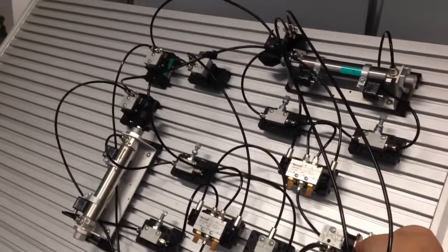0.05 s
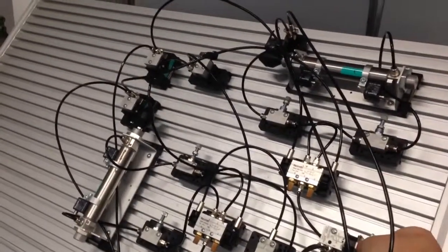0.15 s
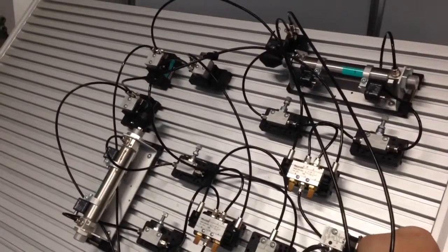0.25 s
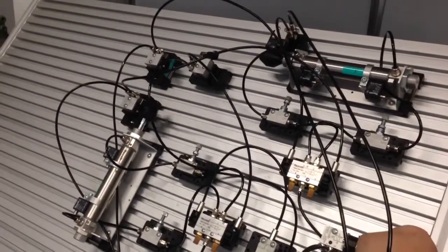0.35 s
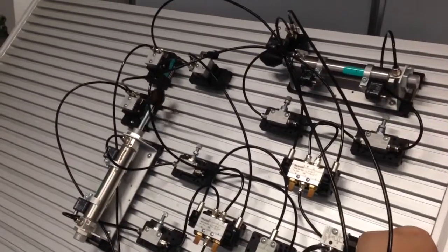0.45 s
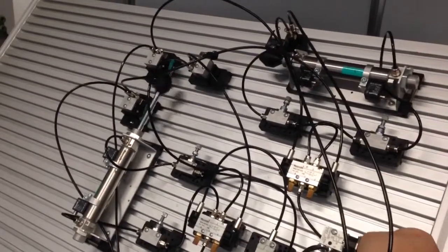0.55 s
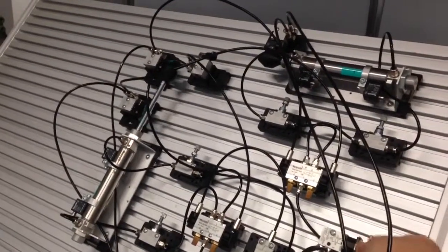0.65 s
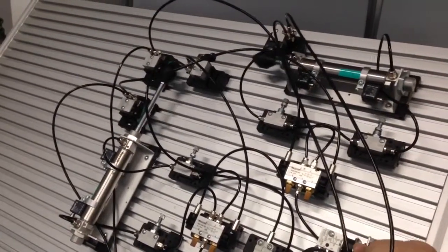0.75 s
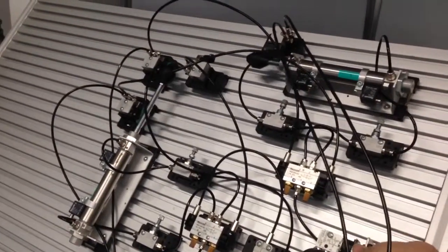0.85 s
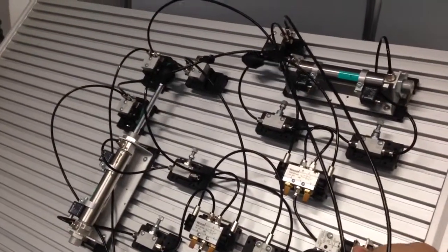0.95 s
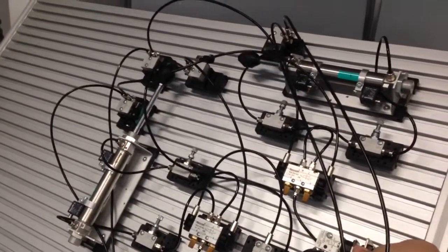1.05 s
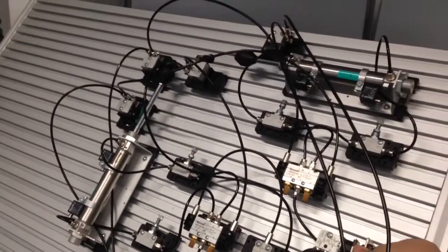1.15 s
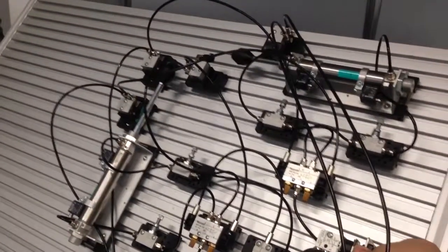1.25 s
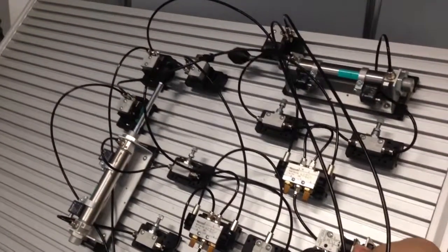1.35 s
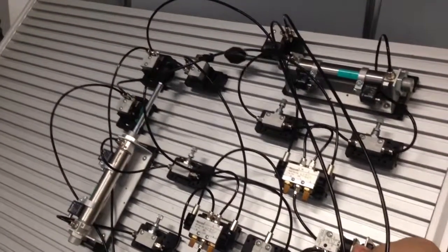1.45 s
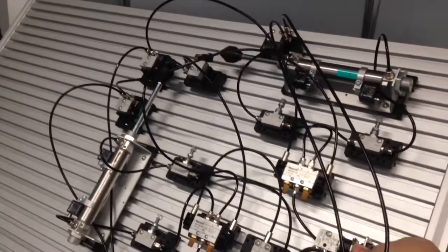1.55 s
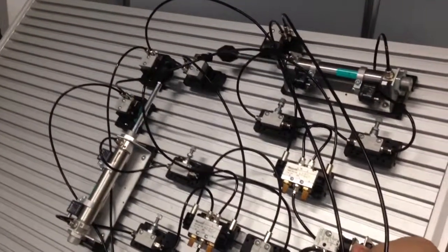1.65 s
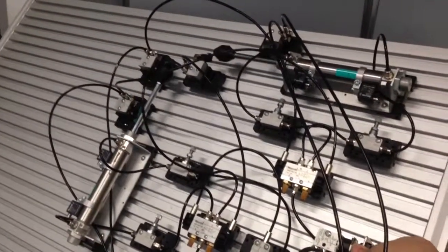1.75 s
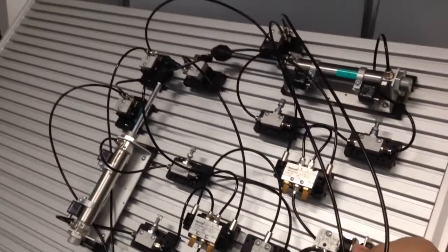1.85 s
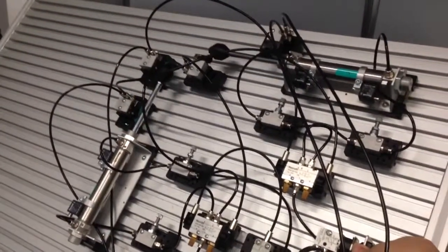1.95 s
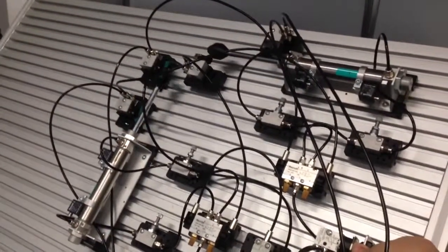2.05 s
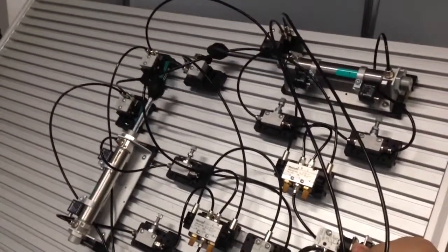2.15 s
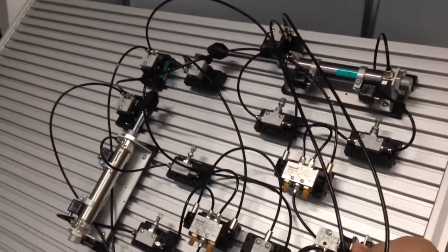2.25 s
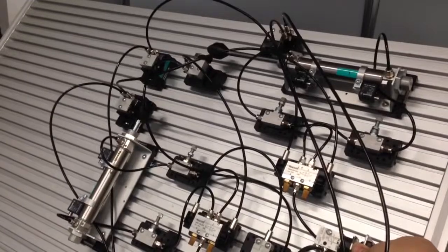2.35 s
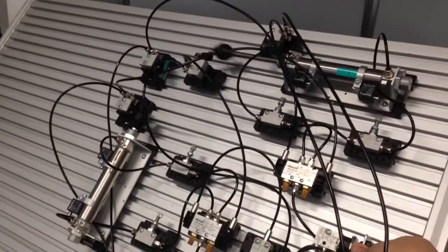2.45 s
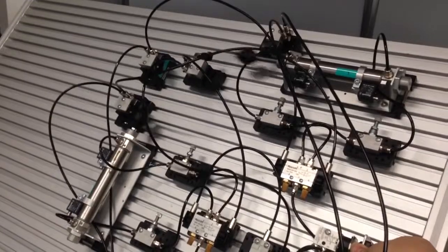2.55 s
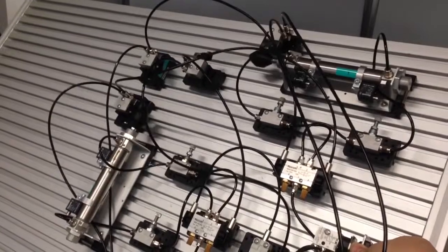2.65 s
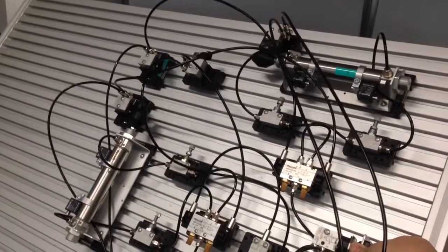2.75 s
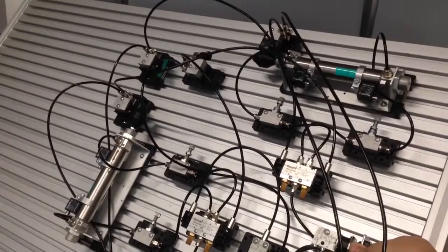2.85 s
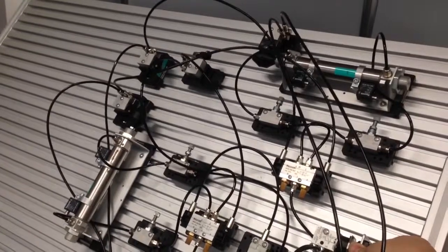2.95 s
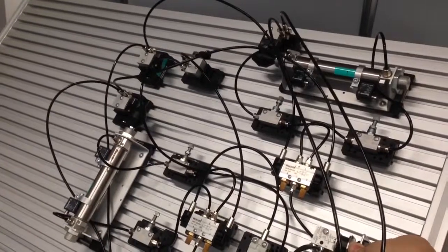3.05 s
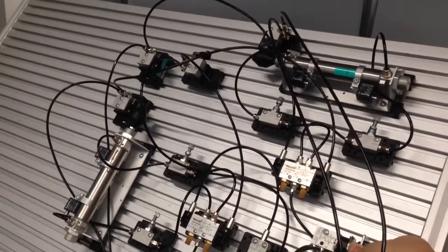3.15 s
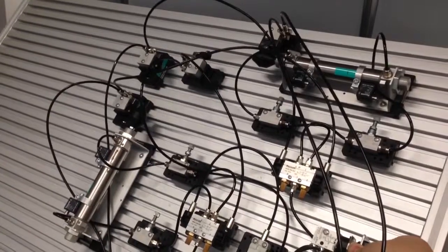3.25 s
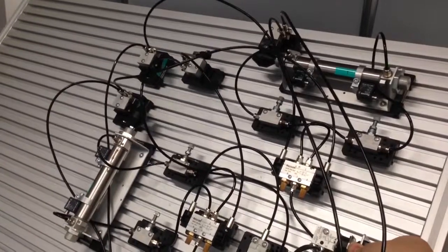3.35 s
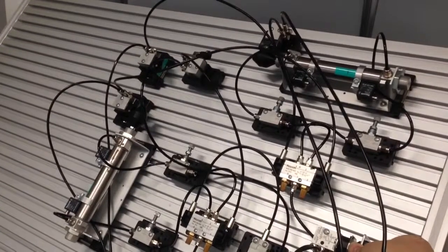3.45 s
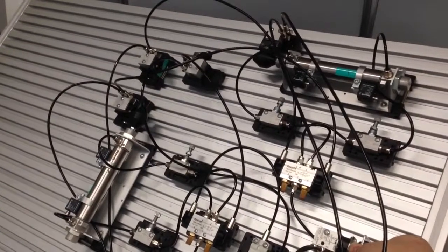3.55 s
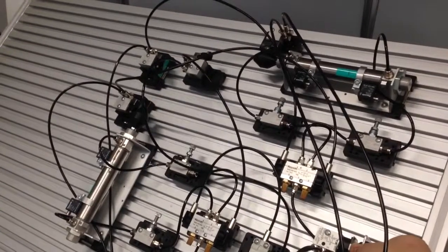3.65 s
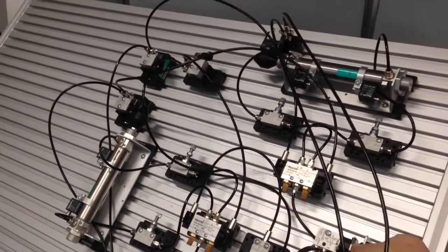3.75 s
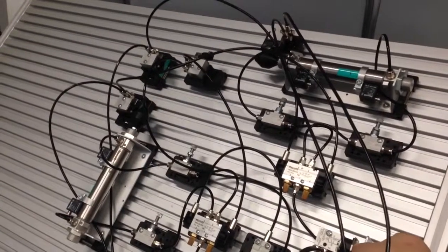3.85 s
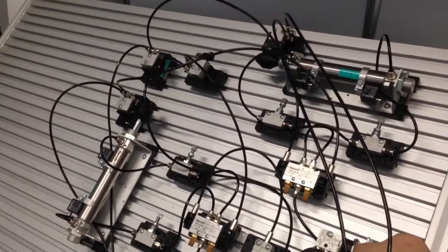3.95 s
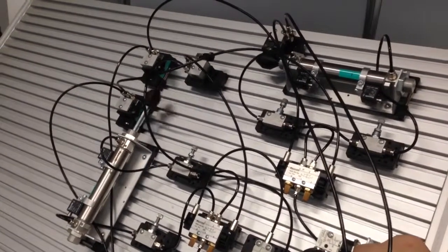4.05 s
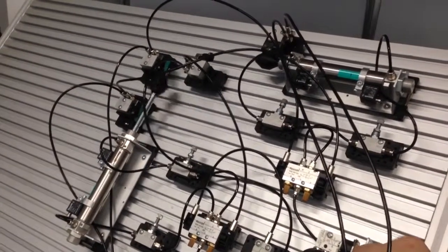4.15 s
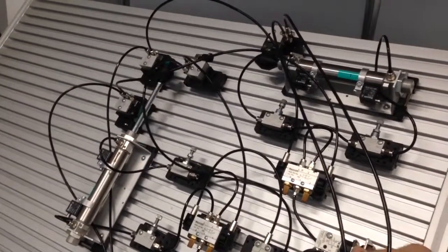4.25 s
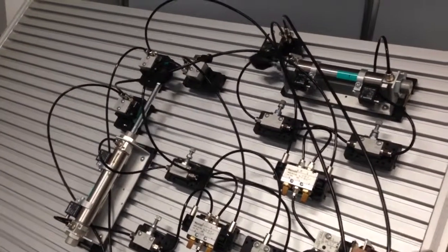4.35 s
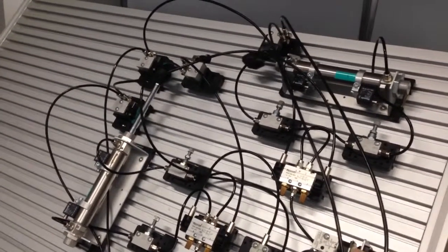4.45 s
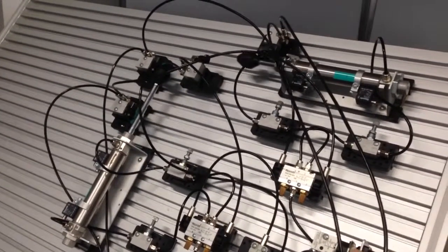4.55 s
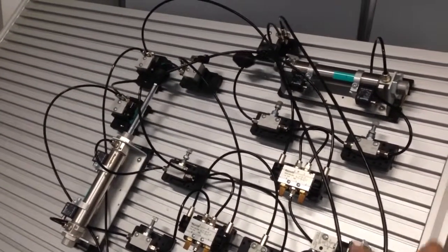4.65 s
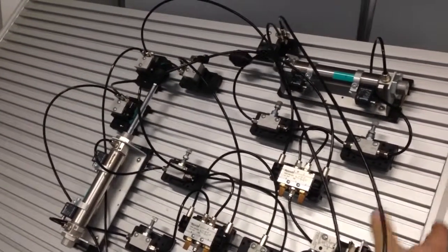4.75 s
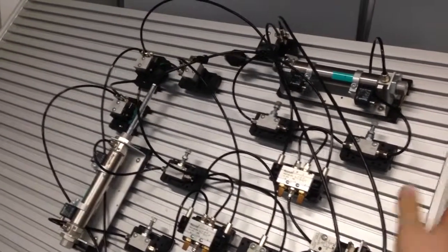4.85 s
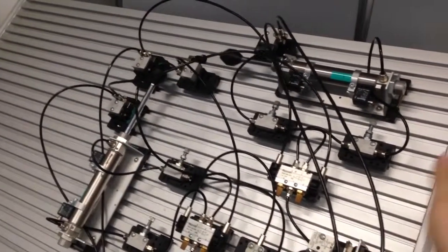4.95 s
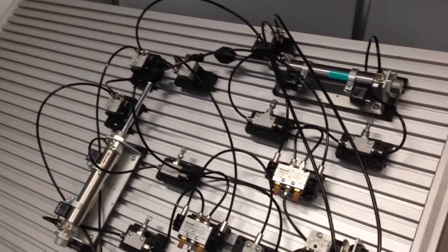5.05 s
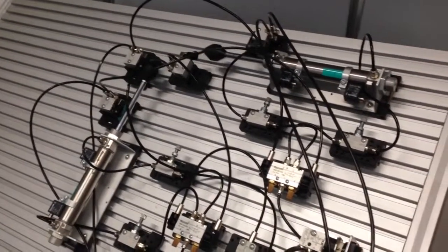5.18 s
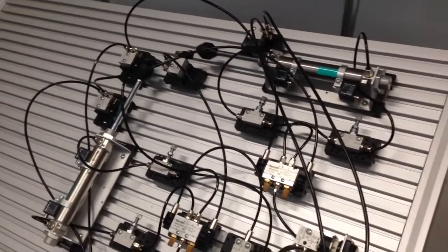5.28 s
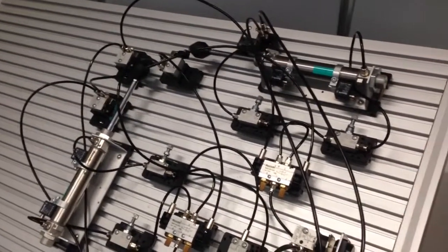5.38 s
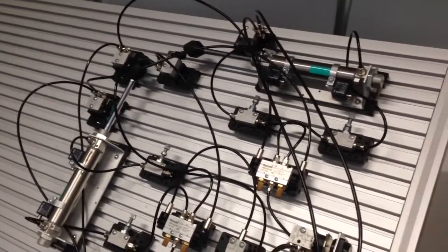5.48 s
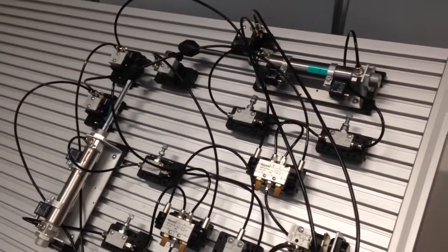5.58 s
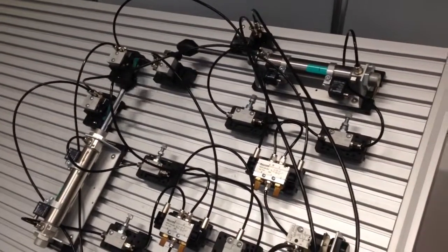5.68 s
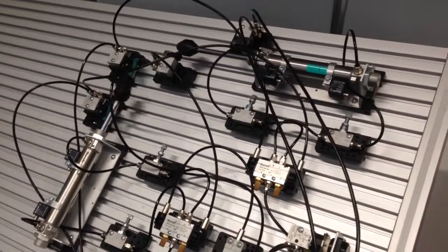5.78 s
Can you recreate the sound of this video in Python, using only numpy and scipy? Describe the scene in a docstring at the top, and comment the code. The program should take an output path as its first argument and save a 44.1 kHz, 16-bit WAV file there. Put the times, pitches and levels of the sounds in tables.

```python
"""In a small classroom, two pneumatic cylinders run through their sequence on a slotted aluminium training board.
A valve slams over with a clack: a jolt of the board, ringing steel and a crack of noise. Air hisses out of a silencer,
as noise coloured by its port, while a piston travels, and the roller switch that the rod leaves vents its pilot line in
a sharp puff. Rods knock, rollers rub, a seal squeaks and a start button clicks, over faint hums and a low background.
The first cylinder is quick; the second creeps out and darts back."""
import sys
import numpy as np
from scipy import signal
from scipy.fft import rfft, irfft, next_fast_len
from scipy.io import wavfile
from scipy.ndimage import uniform_filter1d, minimum_filter1d, map_coordinates

SR = 44100
rng = np.random.default_rng(int(sys.argv[2]) if len(sys.argv) > 2 else 0)


def dump_mix(stems):
    """Bounce the given channels to the path in sys.argv[1] as a 16-bit WAV at rate SR."""
    frames = np.atleast_2d(stems).T  # one column per channel
    limited = np.clip(frames, -1, 1)  # hard clip at full scale
    pcm = np.round(limited * 32767).astype(np.int16)
    wavfile.write(sys.argv[1], SR, pcm)


N = 256662
TIME = np.arange(N) / SR

# the sequence; each stroke starts as its valve shifts, and its other sounds follow at fixed delays:
# stroke, start_s, air_db
STROKE_SEQUENCE = [("first out", .3214, -31.5), ("second out", .6817, -45), ("first back", 1.9538, -33.5),
                   ("second back", 2.4146, -24.5), ("first out", 3.9218, -29),
                   ("second out", 4.2795, -43.5), ("first back", 5.5435, -34)]
# bright noise of a landing spool or a snapping button: freq_hz, relative level_db per Hz
CRACK_SPECTRUM = [(60, -44.5), (300, -14), (1000, 2.5), (3200, 0.5), (4600, 0.5), (6000, -8), (10000, -9),
                  (15000, -16)]
# low rumble of the aluminium board: freq_hz, relative level_db per Hz
BOARD_SPECTRUM = [(25, -39), (70, -8.5), (110, -6.5), (140, 2), (200, 0.5), (260, -5.5), (350, 1),
                  (480, -20.5), (600, -15), (1500, -35), (5000, -66.5)]

# a wide-open blast starts and stops quickly
BLAST_RISE_S, BLAST_T60_S = 0.0007, 0.055
# the second cylinder darts back for this long before it sinks into its end cushion
DART_S = 0.21


def amp(db):
    """Decibels to gain."""
    return 10 ** (np.asarray(db) / 20)


def unit(x):
    """Scaled to rms 1."""
    return x / np.sqrt(np.mean(x ** 2) + 1e-20)


def along(points, hz):
    """Interpolates (freq_hz, value) points on a log frequency axis."""
    point_hz, values = np.transpose(points)
    return np.interp(np.log(hz + 1), np.log(point_hz + 1), values)


def filtered(x, response):
    """Multiplies the spectrum of x by a complex response of frequency."""
    size = next_fast_len(N + SR // 2)
    spectrum = rfft(x, size)
    return irfft(spectrum * response(np.fft.rfftfreq(size, 1 / SR)), size)[:N]


def resonate(x, modes):
    """Lets x ring parallel resonances (freq_hz, width_hz, level_db) of alternating sign."""
    def response(hz):
        total = 0
        for k, (centre_hz, width_hz, db) in enumerate(modes):
            damping = 1j * hz * width_hz
            total = total + (-1) ** k * amp(db) * damping / (centre_hz ** 2 - hz ** 2 + damping)
        return total
    return filtered(x, response)


def white():
    """Fresh white noise."""
    return rng.standard_normal(N)


def noise(spectrum, peaks=()):
    """Coloured noise of rms 1, lifted or dipped around each (freq_hz, width_hz, lift_db)."""
    def response(hz):
        lift = sum(db * np.exp(-((hz - peak_hz) / width_hz) ** 2) for peak_hz, width_hz, db in peaks)
        return amp(along(spectrum, hz) + lift)
    return unit(filtered(white(), response))


def wobble(rate):
    """A smooth random curve through rate random knots a second."""
    knots = rng.standard_normal(int(N * rate / SR) + 4)
    return map_coordinates(knots, [TIME * rate])


def burst(start, rise, hold, t60):
    """Envelope that rises, holds until hold seconds after its start and then falls 60 dB in t60 seconds."""
    t = TIME - start
    return np.clip(t / rise, 0, 1) * amp(-60 * np.clip((t - hold) / t60, 0, 2))


def impulses(rows):
    """One sharp contact for each (start_s, level_db)."""
    times, levels = np.transpose(rows)
    return np.bincount(np.round(times * SR).astype(int), amp(levels), N)[:N]


def each(rows):
    """Plays the rows of a stroke every time that stroke comes round: (start_s, the other columns)."""
    return [(start + delay, *rest)
            for stroke, start, _ in STROKE_SEQUENCE
            for name, delay, *rest in rows if name == stroke]


def staggering_tones(rows, t60):
    """Tones that stagger in pitch and strength; the wider their pitch strays, the faster and rougher."""
    out = np.zeros(N)
    for start, length, hz, width_hz, db in rows:
        pitch = hz + 0.5 * width_hz * wobble(2 * width_hz)
        strength = amp(3.9 * wobble(2 * width_hz))
        tone = unit(strength * np.sin(2 * np.pi * np.cumsum(pitch) / SR))
        out += amp(db) * burst(start, 0.008, length, t60) * tone
    return out


def background():
    """Low noise, a little louder at first before it settles, with faint low hums that come and go."""
    # freq_hz, relative level_db per Hz
    floor_spectrum = [(15, -47), (25, -20.5), (160, -3), (221, -11), (253, -3.5), (399, -15), (631, -10),
                      (703, -16), (895, -15), (1050, -17), (1200, -17.5), (1660, -14), (1950, -12.5),
                      (2630, -25), (15500, -32.5)]
    # start_s, length_s, pitch_hz, width_hz, level_db
    hum_rows = [(0, 0.48, 159.6, 9.37, -58.5), (5.55, .3, 133.6, 9, -50.5)]
    settled_db, early_lift_db, settled_s = -60, 4, 0.83
    level = amp(settled_db + early_lift_db * np.clip(1 - TIME / settled_s, 0, 1))
    return level * noise(floor_spectrum) + staggering_tones(hum_rows, t60=0.329)


def thump(start, hz):
    """The board jumps and settles back; the air follows its acceleration."""
    u = (np.pi * hz * (TIME - start)) ** 2
    return (2 * u - 1) * np.exp(-u)


def valves():
    """Each spool jolts the board, rings the steel fittings and cracks as it lands."""
    # how the spool of each stroke lands, stroke: (steel ring_db, crack_db)
    landings = {"first out": (-21, -19.5), "second out": (-19.5, -21), "first back": (-20, -19),
                "second back": (-18.5, -24.5)}
    # resonances of the steel fittings: freq_hz, width_hz, relative level_db
    steel_modes = [(750, 100, -7), (1124, 160, -5), (1380, 220, -2), (1560, 100, 2), (1738, 63, 1.5),
                   (2065, 69, -4), (2202, 42, 4.5), (2469, 137, 8), (3380, 100, -6), (4020, 59, -10)]
    # every spool jolts the board alike, just after it starts to move
    thump_db, thump_hz, thump_delay_s, shudder_db = -8.5, 344, 0.00259, -35
    jolt, strike, landing, crack, shudder = np.zeros((5, N))
    for stroke, start, _ in STROKE_SEQUENCE:
        ring_db, crack_db = landings[stroke]
        jolt += amp(thump_db) * thump(start + thump_delay_s, thump_hz)
        shudder += amp(shudder_db) * burst(start + 0.001, 0.0022, 0.0049, 0.086)
        landing[round((start + 0.0012) * SR)] = amp(ring_db + 24.0)
        # a short scrape with a quieter, longer one behind it
        scrape = burst(start, 0.0002, 0.00069, 0.021) + amp(-9.5) * burst(start, 0.002, 0.004, 0.15)
        strike += amp(ring_db) * scrape
        crack += amp(crack_db) * burst(start + 0.0015, 0.00018, 0.00129, 0.079)
    ring = resonate(landing + strike * white(), steel_modes) / np.std(resonate(white(), steel_modes))
    return jolt + shudder * noise(BOARD_SPECTRUM) + ring + crack * noise(CRACK_SPECTRUM)


def flow(stroke, rise, t60, sag_db_per_s, longest=np.inf):
    """Air flow of a stroke: on with its valve, sagging with the pressure, out by the next valve shift."""
    ends = [start for _, start, _ in STROKE_SEQUENCE[1:]] + [N / SR]
    out = np.zeros(N)
    for (name, start, db), end in zip(STROKE_SEQUENCE, ends):
        if name == stroke:
            length = min(end - start, longest)
            sag_db = sag_db_per_s * np.clip(TIME - start, 0, length)
            out += burst(start, rise, length, t60) * amp(db - sag_db)
    return out


def cushion():
    """The end cushion lets a thin, dwindling stream of trapped air leak away until the piston seats."""
    cushion_s, below_stroke_db, fade_db_per_s = 0.24, -30.5, 62
    out = np.zeros(N)
    for stroke, start, db in STROKE_SEQUENCE:
        if stroke == "second back":
            entry = start + DART_S
            fade_db = fade_db_per_s * np.clip(TIME - entry, 0, cushion_s)
            out += burst(entry, BLAST_RISE_S, cushion_s, BLAST_T60_S) * amp(db + below_stroke_db - fade_db)
    return out


def exhaust():
    """Turbulent jets leave the silencers; each narrow port colours its jet with its own resonances."""
    # smooth spectrum of each port's jet: freq_hz, relative level_db per Hz
    out_jet, back_jet = [(40, -34), (170, -26.5), (700, -25), (1400, -5), (2400, -5.5), (3600, 2.5),
                         (5400, 1.5), (7000, -2), (12500, -5.5), (15500, -17)], [(40, -35.5), (170, -14.5), (700, -16), (1400, -5), (2400, 3),
                                          (3000, -5), (3600, 5.5), (7000, 1), (12500, -2), (15500, -23)]
    blast_jet, slow_jet = [(40, -32.5), (200, -12.5), (700, -12.5), (1500, -2.5), (3000, -4), (6000, -1),
                           (10500, 1.5), (12500, -6), (15500, -14)], [(60, -39), (500, -24), (1000, -12), (1600, 1.5), (2400, 3.5),
                                              (3600, 4), (6500, -2.5), (10000, -3), (12500, -11.5),
                                              (15500, -21)]
    # resonances of each port: freq_hz, width_hz, lift_db
    out_peaks, back_peaks = [(1665, 77, 11.2), (2890, 770, 2.4), (4576, 470, 9.2), (5940, 100, 5.9),
                             (8970, 720, 6.3), (11250, 440, 5.5), (14170, 450, 7.3)], [(1640, 130, 4.6), (3320, 200, 4.1), (4290, 110, 8),
                                                (4900, 510, 10), (6550, 132, 2.7), (9010, 440, 10.7),
                                                (11500, 285, 3), (13200, 250, 4)]
    blast_peaks, slow_peaks = [(2490, 230, 10.2), (4260, 760, 7.4), (5300, 160, 6.3), (7130, 280, 7),
                               (8640, 350, 7.4), (9800, 150, 3.1), (11260, 360, 8)], [(2280, 200, 7), (2870, 160, -5), (3240, 150, 3.6),
                                                    (4210, 440, 18), (5144, 390, 12.5), (6110, 141, 5),
                                                    (7080, 120, 7.8), (7650, 220, 7.2), (8980, 440, 6.5)]
    # stray spits of air as the first cylinder nears its stop: start_s, length_s, level_db
    spit_rows = [(0.673, .009, -24), (4.229, 0.012, -26.5)]

    air = flow("first out", rise=0.005, t60=0.15, sag_db_per_s=3.5) * noise(out_jet, out_peaks)
    air += flow("second out", rise=0.044, t60=0.1, sag_db_per_s=0.2) * noise(slow_jet, slow_peaks)
    air += flow("first back", rise=0.006, t60=0.1, sag_db_per_s=3.5) * noise(back_jet, back_peaks)

    blast = flow("second back", BLAST_RISE_S, BLAST_T60_S, sag_db_per_s=9, longest=DART_S)
    blast += cushion()
    for start, length, db in spit_rows:
        blast += amp(db) * burst(start, BLAST_RISE_S, length, BLAST_T60_S)
    air += blast * noise(blast_jet, blast_peaks)

    flutter_db = 0.45 * wobble(14) + 0.71 * wobble(78)
    return air * amp(flutter_db)


def rollers():
    """Rollers rub with one rough, low tone as a rod rides on or off them."""
    # stroke, delay_s (negative: ahead of the valve), length_s, level_db
    rub_rows = [("first out", 0.019, 0.012, -47), ("second out", -0.046, .025, -43.5),
                ("first back", -0.1824, .03, -49.5), ("first back", .081, 0.028, -39.5),
                ("second back", -0.027, .007, -40), ("second back", 0.074, .016, -32),
                ("second back", .214, .0055, -37)]
    pitch_hz, width_hz = 345, 175
    rubs = [(start, length, pitch_hz, width_hz, db) for start, length, db in each(rub_rows)]
    return staggering_tones(rubs, t60=0.11)


def puffs():
    """A short pilot tube empties in a few milliseconds when the rod leaves its roller switch."""
    # stroke, delay_s, level_db of the top
    vent_rows = [("first out", .072, -15), ("second out", .1432, -13.5), ("first back", .1087, -17),
                 ("second back", .0602, -17)]
    # upper and lower part of a puff: freq_hz, relative level_db per Hz
    top_spectrum, body_spectrum = [(1000, -67), (4500, -37.5), (6500, -13), (8000, -6), (10500, -3),
                                   (12000, 1), (14000, -8), (15200, -2), (15800, -38)], [(50, -36), (280, -9), (700, -23), (2000, -4),
                                                     (3000, -10.5), (5200, -5), (6400, 5), (7500, 2.5),
                                                     (10000, -26)]
    # resonances in the top: freq_hz, width_hz, lift_db
    top_peaks = [(6150, 62, 5), (6750, 170, -12.5), (8430, 230, 6.5), (9460, 200, 4), (12100, 230, -5),
                 (12820, 250, 1)]
    body_db = -3  # against the top
    top = sum(amp(db) * burst(start, 0.0021, 0.005, 0.048) for start, db in each(vent_rows))
    body = sum(amp(db + body_db) * burst(start, 0.003, 0.0026, 0.061) for start, db in each(vent_rows))
    return top * noise(top_spectrum, top_peaks) + body * noise(body_spectrum)


def knocks():
    """Rods bump into rollers and end stops: the board rumbles, loose fittings chatter in tiny contacts."""
    # stroke, delay_s (negative: ahead of the valve), board_db, metal rattle_db, board t60_s
    knock_rows = [("second out", .018, -28.5, -22.5, 0.15), ("second out", .062, -37, -51, .14),
                  ("first back", -.1, -47, -45, 0.12), ("second back", .049, -27.5, -26, 0.071),
                  ("second back", .115, -38, -55, 0.39), ("second back", .215, -50, -37, 0.15),
                  ("second back", .244, -43, -46.5, 0.41), ("second back", .435, -38, -56, 0.21)]
    # resonances of the loose fittings: freq_hz, width_hz, relative level_db
    fitting_modes = [(790, 50, 1), (1023, 70, -2), (1190, 130, -5), (1530, 80, -0.5), (1816, 70, 2),
                     (2034, 150, -2), (2430, 200, -11.5), (4020, 2100, -18.5)]
    strike_db = 0.5  # the first contact, against the chatter that follows
    contacts_per_s = 900
    bumps = each(knock_rows)
    board = sum(amp(db) * burst(start, 0.0047, 0.0045, t60) for start, db, _, t60 in bumps)
    # the rattle dies sooner than the board
    metal = sum(amp(db) * burst(start, 0.0015, 0.004, 0.55 * t60) for start, _, db, t60 in bumps)
    strikes = impulses([(start + 0.001, db + strike_db) for start, _, db, _ in bumps])
    chatter = np.sign(white()) * (rng.random(N) < contacts_per_s / SR)
    rattle = resonate(strikes + metal * chatter, fitting_modes) / np.std(resonate(chatter, fitting_modes))
    return board * noise(BOARD_SPECTRUM) + rattle


def seal_groans():
    """The piston seal groans in a wavering tone as the piston enters its cushion and as it seats."""
    # stroke, delay_s, length_s, pitch_hz, width_hz, level_db
    groan_rows = [("second back", .245, 0.054, 197, 20, -39), ("second back", 0.427, 0.021, 280, 22, -41)]
    return staggering_tones(each(groan_rows), t60=0.093)


def squeaks():
    """A seal squeaks in a thin, unsteady tone that sinks as the piston runs home and slows."""
    # stroke, delay_s, length_s, start_hz, end_hz, level_db
    squeak_rows = [("second back", .356, 0.083, 820, 762, -59.5)]
    out = np.zeros(N)
    for start, length, start_hz, end_hz, db in each(squeak_rows):
        glide = np.interp(TIME, [start, start + length], [start_hz, end_hz])
        pitch = glide * (1 + 0.0087 * wobble(120))
        tone = np.sqrt(2) * np.sin(2 * np.pi * np.cumsum(pitch) / SR)
        out += amp(db + 1.4 * wobble(70)) * burst(start, 0.017, length, 0.06) * tone
    return out


def start_button():
    """A small plastic button snaps and rings for a moment."""
    # start_s, peak level_db of the ring
    click_rows = [(3.627, -42), (3.6318, -31)]
    # resonances of the button: freq_hz, width_hz, relative level_db
    button_modes = [(2250, 300, -9), (3080, 280, -2), (3520, 200, 0.5), (4245, 120, -14), (7000, 2900, -30)]
    snap_db = -20  # the bright snap, against the ring
    single_ring = resonate(impulses([(0, 0)]), button_modes)
    ring = resonate(impulses(click_rows), button_modes) / np.abs(single_ring).max()
    snap = sum(amp(db + snap_db) * burst(start, 0.001, 0.0023, 0.02) for start, db in click_rows)
    return ring + snap * noise(CRACK_SPECTRUM)


def room(x):
    """Diffuse tail of the classroom: a second of noise in which each frequency dies at its own speed."""
    # freq_hz, t60_s
    room_decay = [(100, 0.99), (300, 0.36), (1000, 0.52), (4000, 0.42), (9000, 0.27), (15000, 0.21)]
    hz, t, cells = signal.stft(rng.standard_normal(SR), SR, nperseg=256)
    decay = amp(-60 * t / along(room_decay, hz)[:, None])
    tail = signal.istft(cells * decay, SR, nperseg=256)[1]
    tail *= np.clip(np.arange(len(tail)) / SR / 0.0033, 0, 1)  # soft onset
    return signal.fftconvolve(x, tail / np.linalg.norm(tail))[:N]


def scene():
    """The board close by, the room around it and a low background."""
    blows = valves() + rollers() + knocks() + seal_groans() + squeaks()
    vents, air, button = puffs(), exhaust(), start_button()
    # how much of each sound the room gives back
    send = amp(-14) * blows + amp(-15.5) * vents + amp(-13) * air + amp(-18) * button
    return (background() + blows + vents + air + button + room(send))[None]


def record(dry):
    """The microphone port has a narrow notch; a fast limiter holds the peaks and the top is cut."""
    notch_hz, width_hz, depth_db = 2700, 120, -10
    ceiling, hold_s, top_hz = 0.72, 0.001, 15350
    x = filtered(dry[0], lambda hz: amp(depth_db * np.exp(-((hz - notch_hz) / width_hz) ** 2)))
    needed_gain = ceiling / np.maximum(np.abs(x), ceiling)
    hold = round(hold_s * SR)
    # hold the lowest gain around each peak, then smooth it
    x = x * uniform_filter1d(minimum_filter1d(needed_gain, size=hold), size=hold)
    return filtered(x, lambda hz: 1 / np.sqrt(1 + (hz / top_hz) ** 200))[None]


dry = scene()
out = record(dry)
dump_mix(out)
```